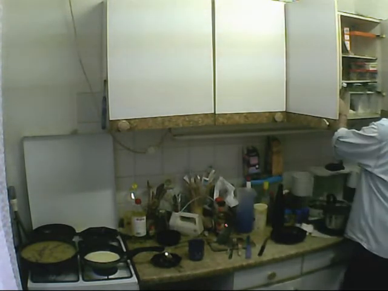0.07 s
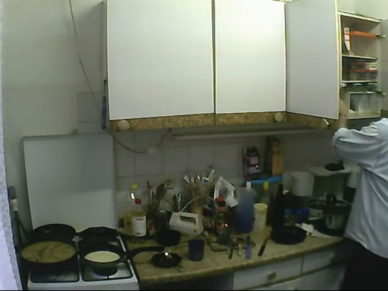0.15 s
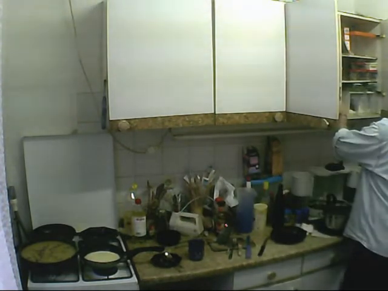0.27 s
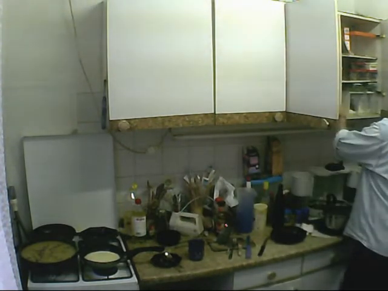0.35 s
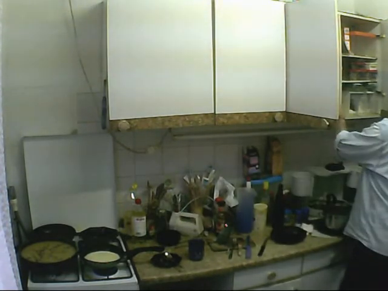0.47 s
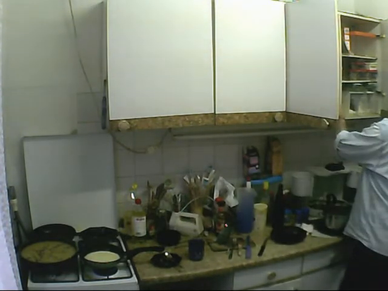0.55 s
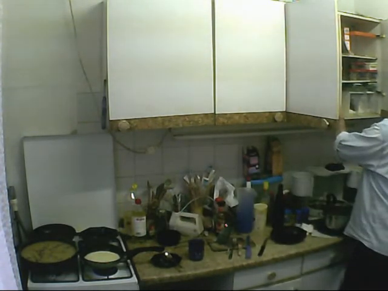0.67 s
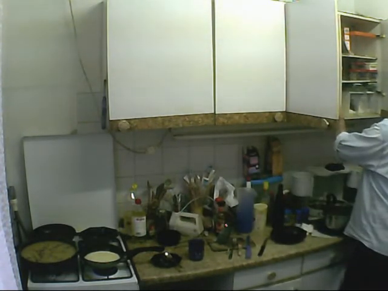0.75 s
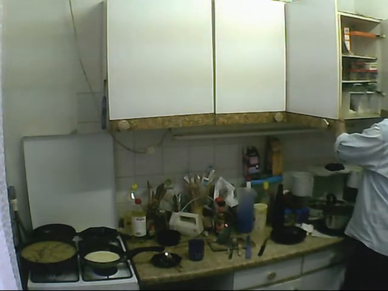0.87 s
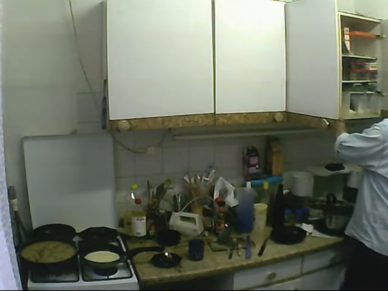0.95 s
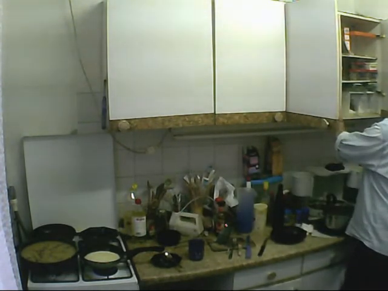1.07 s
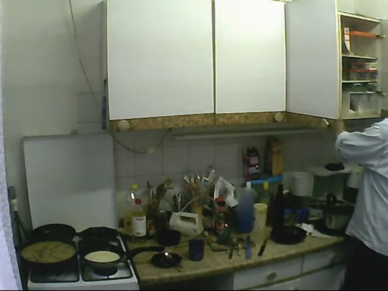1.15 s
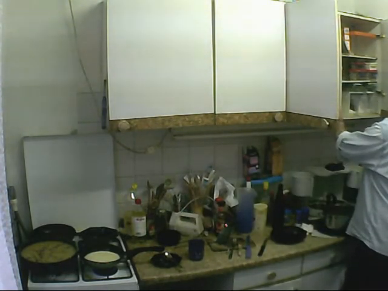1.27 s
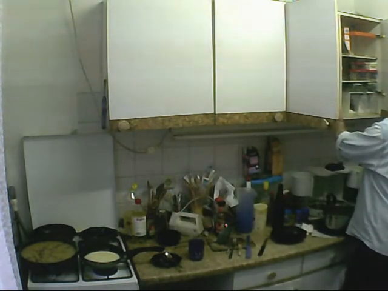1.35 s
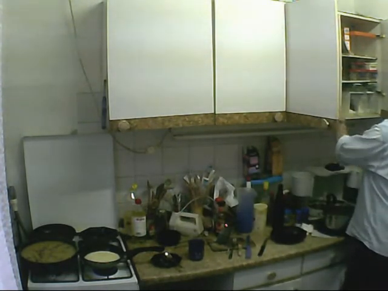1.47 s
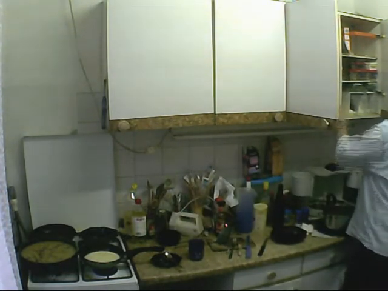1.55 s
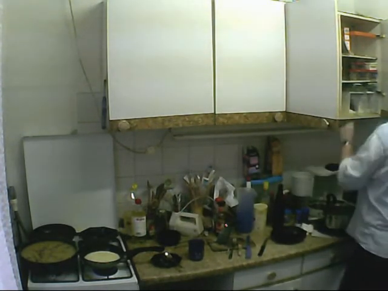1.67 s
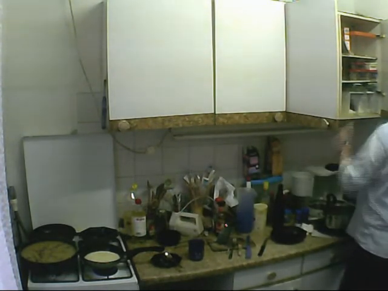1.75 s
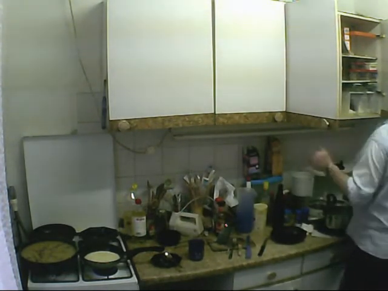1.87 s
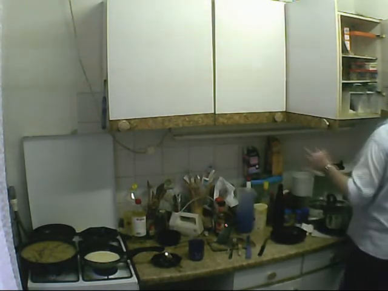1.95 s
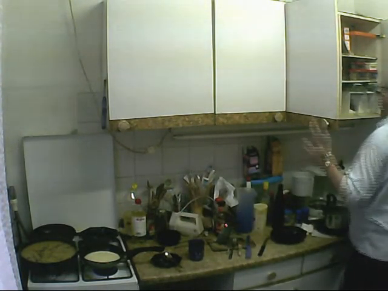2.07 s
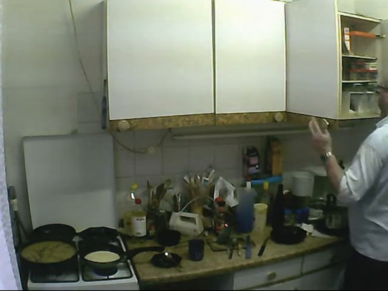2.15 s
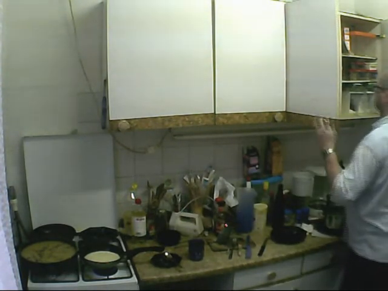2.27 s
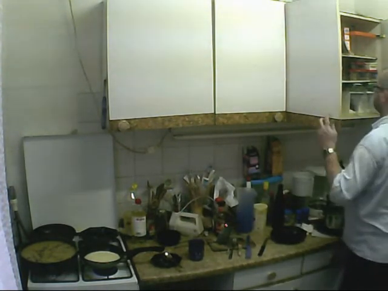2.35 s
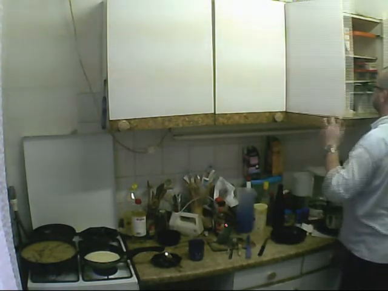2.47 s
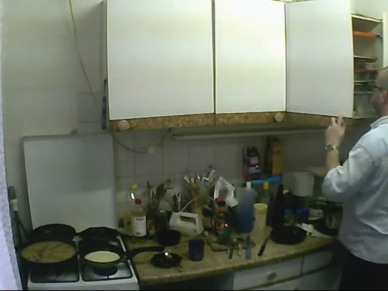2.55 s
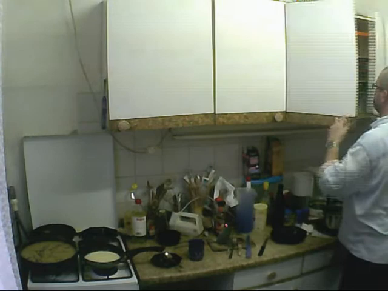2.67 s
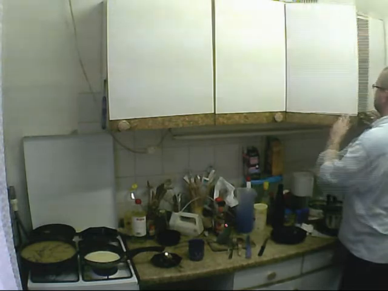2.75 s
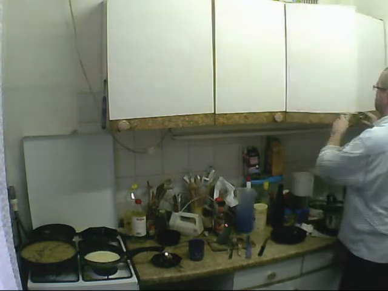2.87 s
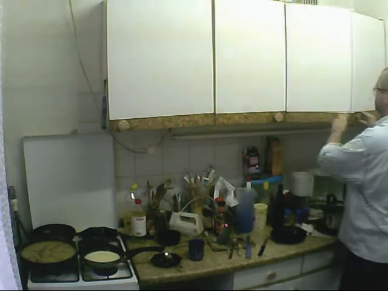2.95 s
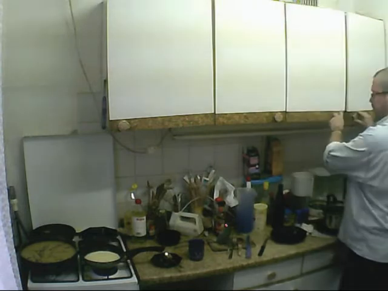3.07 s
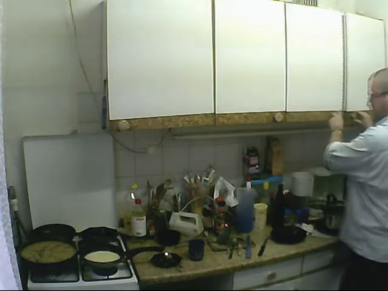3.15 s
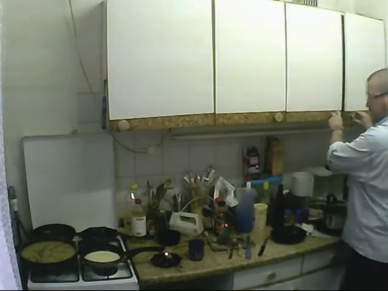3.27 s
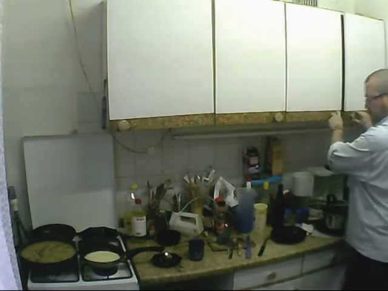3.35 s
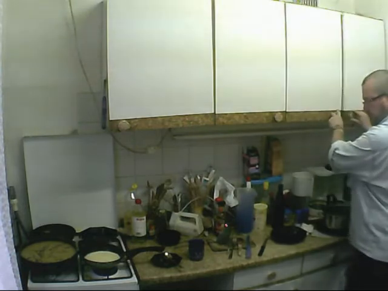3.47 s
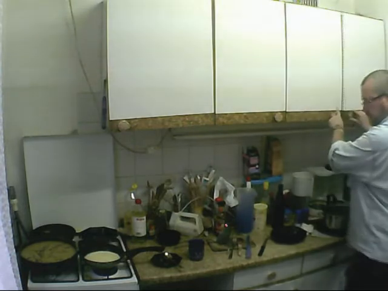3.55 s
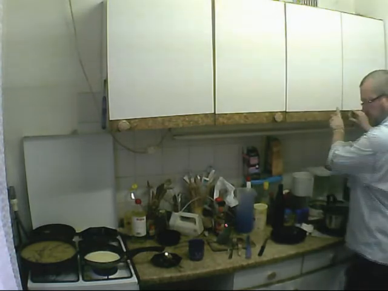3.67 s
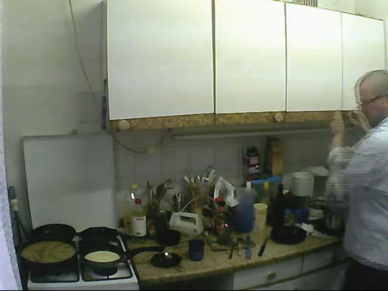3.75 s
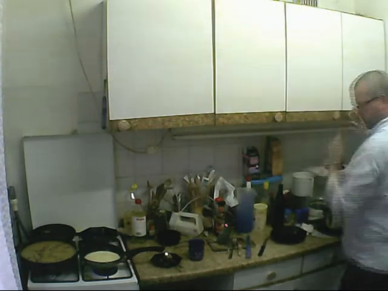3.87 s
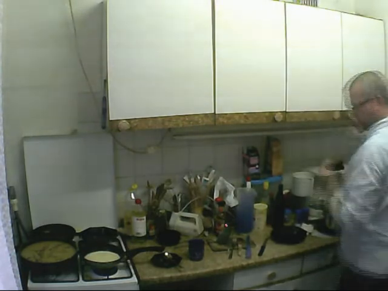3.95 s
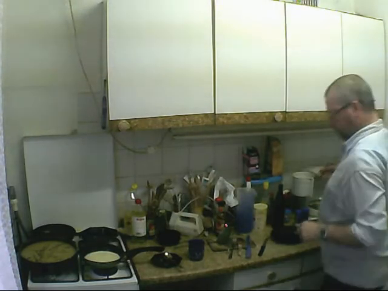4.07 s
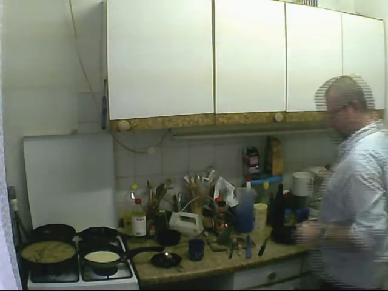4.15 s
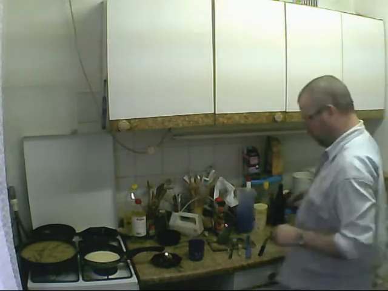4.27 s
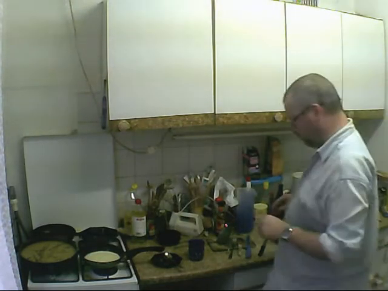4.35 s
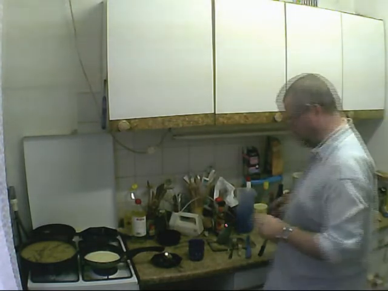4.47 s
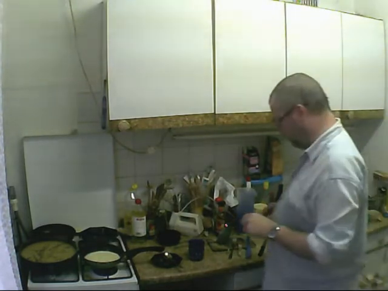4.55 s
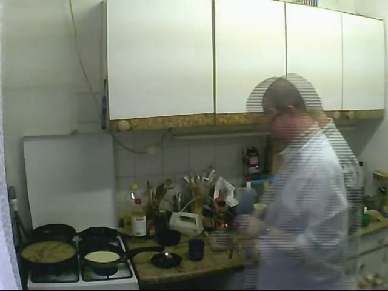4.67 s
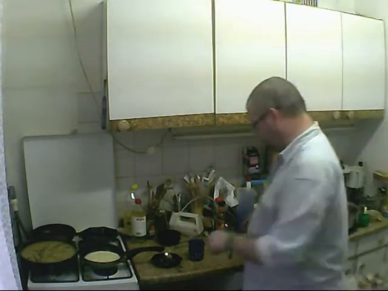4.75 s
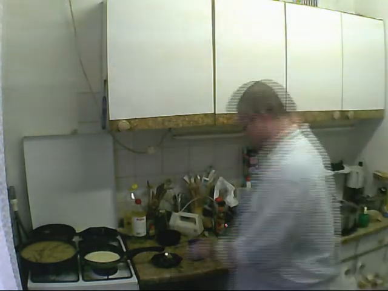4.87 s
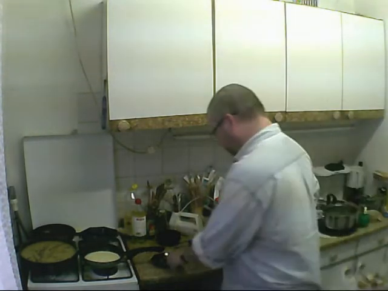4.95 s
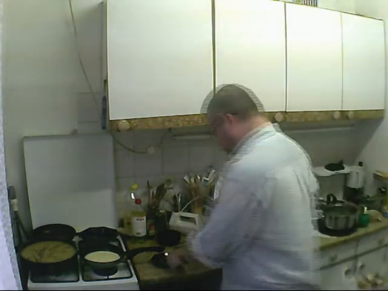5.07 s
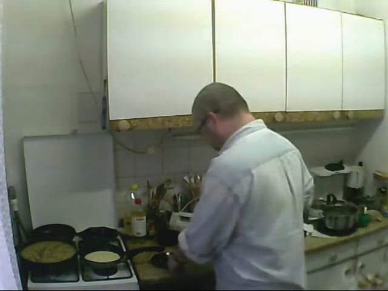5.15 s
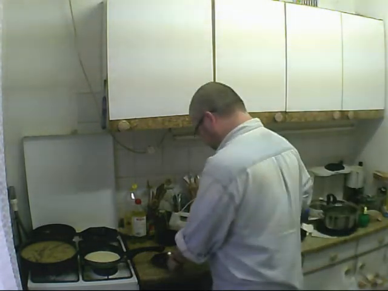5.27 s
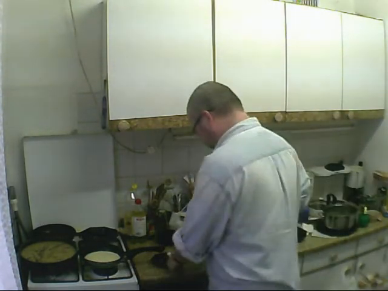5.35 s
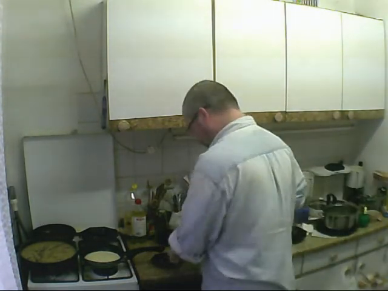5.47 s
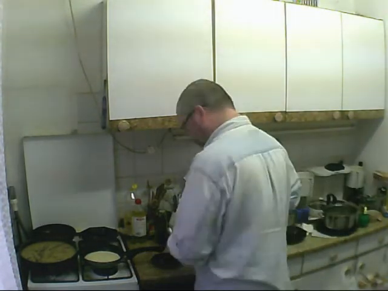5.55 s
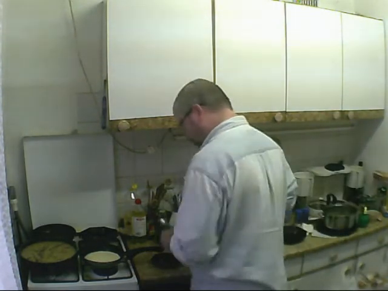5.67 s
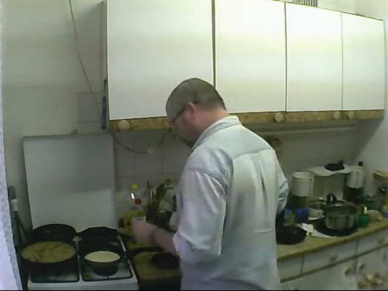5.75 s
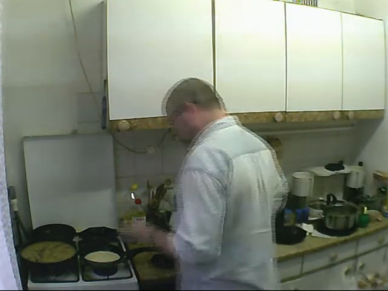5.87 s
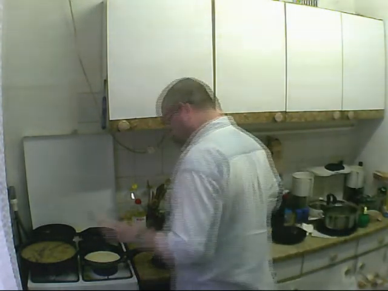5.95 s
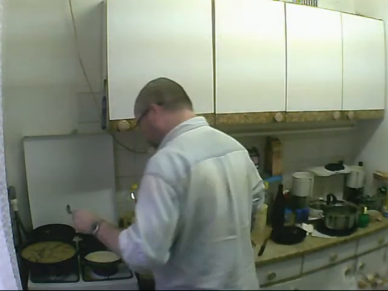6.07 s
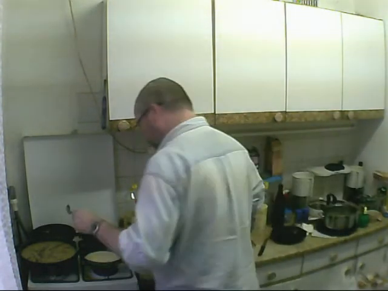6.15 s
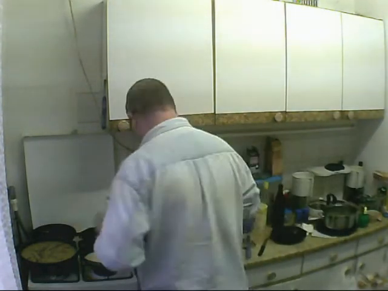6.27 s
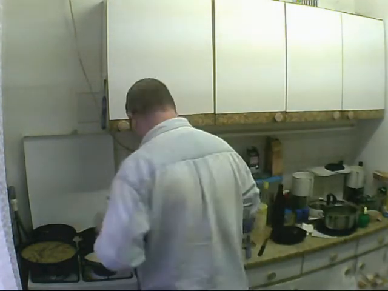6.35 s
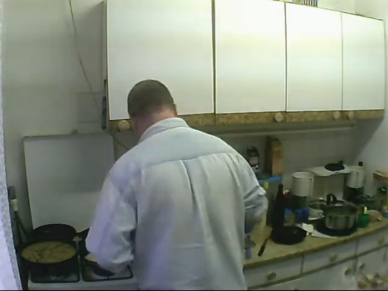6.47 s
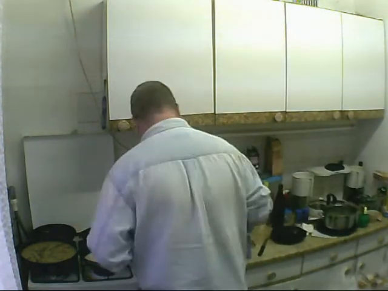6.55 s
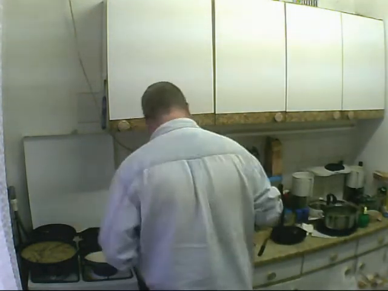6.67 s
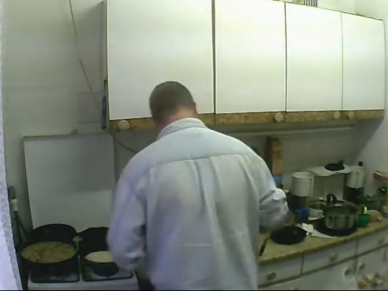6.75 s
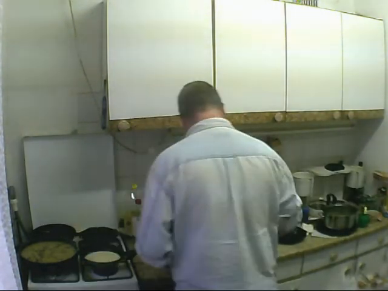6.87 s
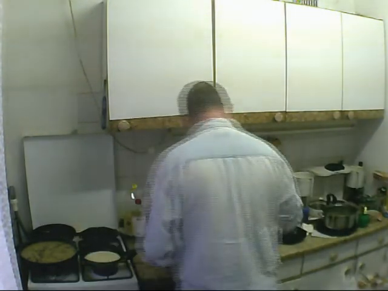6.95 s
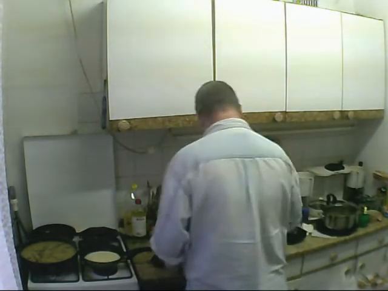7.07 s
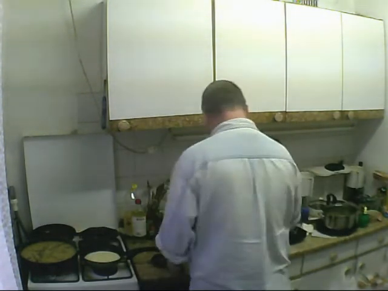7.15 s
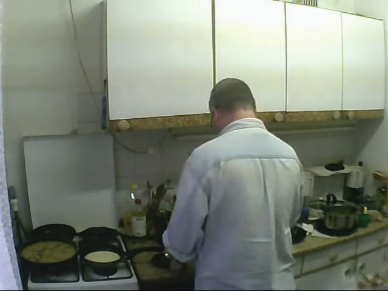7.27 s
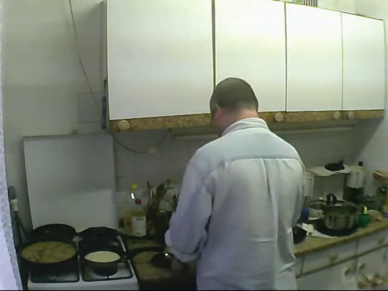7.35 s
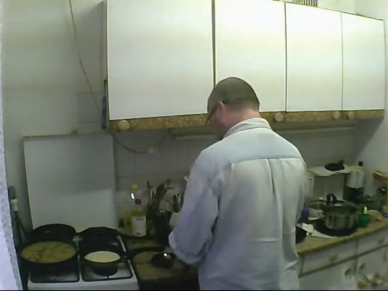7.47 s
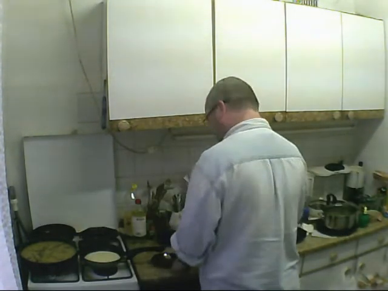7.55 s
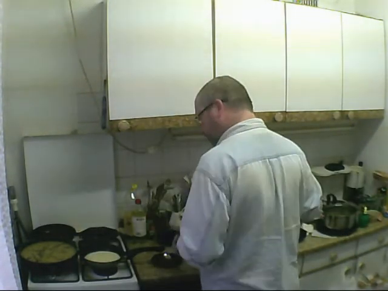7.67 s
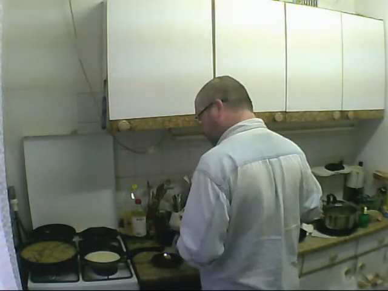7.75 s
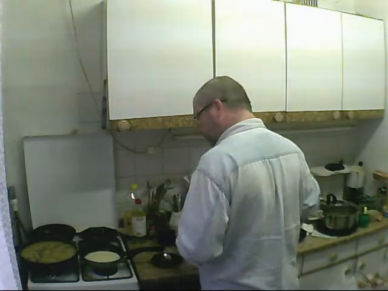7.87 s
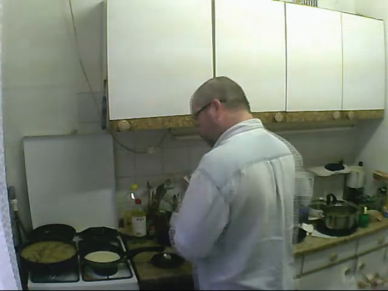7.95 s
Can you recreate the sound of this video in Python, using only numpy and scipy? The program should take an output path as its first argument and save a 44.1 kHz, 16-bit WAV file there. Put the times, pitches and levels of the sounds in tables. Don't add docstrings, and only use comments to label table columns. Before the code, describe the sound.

A small tiled kitchen heard through a cheap, narrow-band camera microphone, with steady low mains hum and faint throbbing hiss. At 0.2-0.35 s a hollow box knocks and booms inside a wall cupboard; quiet sliding and rustle follow to about 1.1 s, with a soft tap at 1.6. From 2.1 s the door leaves bump and swing, with a deeper thump at 2.6 and another at 2.8. A hard wooden slam hits at 3.1 s, then the biggest at 3.4, booming and overloading, with a weak knock at 3.6. Slipper scuffs, cloth rustle and floor-swaying steps run from 3.8 to 5 s. At 5.2 s cutlery clinks on a steel pan with a dull clack. Muffled counter knocks come near 5.85 and 6.5 s, a hard crockery clack with a bounce at 6.83, and a small pot lid lands at 7.25 before it quietens.

```python
import sys
import numpy as np
from scipy import signal
from scipy.fft import rfft, irfft
from scipy.io import wavfile
from scipy.ndimage import uniform_filter1d

SR = 44100
rng = np.random.default_rng(int(sys.argv[2]) if len(sys.argv) > 2 else 0)


def transcribe(signal):
    frames = np.atleast_2d(signal).T
    limited = np.clip(frames, -1, 1)
    pcm = np.round(limited * 32767).astype(np.int16)
    wavfile.write(sys.argv[1], SR, pcm)


def decibels_to_gain(level_db):
    exponent = np.asarray(level_db, float) / 20
    return 10 ** exponent


N = 352800

# multiple of the mains frequency, rms level in dB.
HUM = [(1, -38.5), (3, -50.5), (5, -60), (9, -68), (11, -82)]
MAINS_HZ, MAINS_CREST_S = 49.972, 0.0073
# frequency in Hz, level in dB.
HISS = [(100, 4.5), (300, -4), (670, -4.5), (900, -9.5), (1400, -9.5), (1900, -18), (3040, -16),
        (4500, -25)]
HISS_DB, BUZZ_DEPTH = -56.5, 0.55

# time in seconds, rustle in dB.
BUSY = [(0, -44), (.15, -84), (.4, -65), (.62, -63.5), (1.0, -44), (1.27, -75), (1.67, -53.5),
        (1.91, -59.5), (2.3, -54), (2.9, -76.5), (3.34, -44), (3.5, -46), (3.7, -45), (4.6, -47.5),
        (4.9, -51.5), (7.2, -53), (7.45, -75), (8, -61)]
# time in seconds, peak in dB.
SCUFFS = [
    (1.0, -59),
    (3.17, -58),
    (4.04, -44.5),
    (4.139, -50.5),
]
CLOTH_DB, CLOTH_SHARE = -31.5, 0.56

# time in seconds, floor sway in dB, pushed air in dB.
STEPS = [(2.92, -50, -51), (3.36, -33.5, -43), (3.68, -36.5, -44.5), (3.85, -30.5, -32),
         (3.971, -22.5, -29.5), (4.34, -44.5, -49), (4.652, -18.5, -28.5), (4.77, -21.5, -37.5),
         (4.86, -37, -40.5), (5.08, -32.5, -44.5), (5.28, -39, -49), (5.57, -37.5, -41.5),
         (5.84, -32.5, -28), (6.04, -34, -43.5), (6.63, -35.5, -46.5)]
# time in seconds, peak in dB.
SWINGS = [
    (2.14, -28),
    (2.4, -34.5),
    (2.67, -23),
    (2.81, -29.5),
    (3.28, -23.5),
    (3.6, -25.5),
    (6.551, -37),
]
PUSH_S, SETTLE_S = 0.018, 0.081
STILL_SWAY_DB, STILL_AIR_DB = -51, -59.5

# start in seconds, strength, hollowness and hardness in dB, contact in seconds.
DOORS = [(0.234, -25, -5, -20, 0.043), (0.339, -31, -9, -23, 0.012), (1.13, -40, -2.5, -25, 0.0053),
         (1.57, -33, -11, -25, 0.0016), (2.13, -35, 2.5, -4.5, 0.031), (2.296, -39.5, -3, -42, .012),
         (2.386, -30, -3, -19.5, 0.0059), (2.572, -52.5, -1, 1.5, 0.024), (2.61, -29, -2, -14, 0.048),
         (2.648, -40.5, 7, -4, 0.0066), (2.777, -30, -2, -18.5, 0.023), (2.802, -37, 6.5, -6.5, 0.0071),
         (3.095, -5.5, -10.5, -14, 0.0015), (3.146, -28, 9, -25, 0.014), (3.314, -41.5, -8, -8, .0066),
         (3.384, -30.5, 6, -3.5, 0.011), (3.401, -2, -12.5, -19.5, 0.017), (3.429, -7.5, -10, -22, 0.028),
         (3.616, -36.5, -1.5, -26, 0.031)]
# start in seconds, strength, hollowness and hardness in dB.
BUMPS = [(3.805, -54, -16, -29), (3.888, -27, -7, -11.5), (3.933, -31.5, -16, -30), (4.001, -41, 0, -6),
         (4.073, -42.5, -3.5, -13), (4.135, -35.5, -12, -14), (4.336, -38, 1.5, -15),
         (4.596, -47.5, 13, -7), (4.64, -30, 0.5, -8), (4.689, -35.5, 0, -32), (4.88, -44, -1, -29)]
# start in seconds, strength, hollowness and hardness in dB.
COUNTER = [(5.124, -51.5, 14.5, -14), (5.155, -31.5, 2, -14), (5.203, -24, -12, -4), (5.65, -48.5, -8, -31),
           (5.826, -41.5, 0.5, -18), (5.876, -36.5, -22, -19), (6.036, -36, -2, -23), (6.144, -62, -3, -21),
           (6.445, -39.5, -3, -24.5), (6.482, -36, -1, -26), (6.507, -25.5, -6, -27.5),
           (6.522, -33.5, -6, -27), (6.602, -50, -11, -22), (6.829, -27, -8, -5), (6.855, -38.5, 0.5, 5.5),
           (7.165, -44, -1.5, -15), (7.243, -37.5, -3, -14)]
BUMP_S, COUNTER_S = 0.0082, 0.0095
CLACK_SHARE, COUNTER_CLACK_DB = 0.54, -7.5
# pitch in Hz, level in dB, 60 dB decay in seconds.
PANEL = [(507, -8.5, .04), (577.2, -0.5, 0.11), (608, -2.5, 0.08), (640, 2.5, 0.075), (663, 0, 0.1),
         (698, -0.5, 0.11), (880, -15, 0.024), (990, -15, 0.023), (1052, -9, 0.033)]
# pitch in Hz, level in dB, 60 dB decay in seconds.
CARCASS = [(125, -6.5, 0.01), (165, 2, 0.036), (223, 3, 0.067), (251.6, -2.5, 0.11), (289.4, -3, 0.058),
           (320, -16, 0.013), (384, -6.5, 0.07), (400, -6.5, 0.1)]
# frequency in Hz, level in dB.
CLACK = [(550, -34.5), (900, -1), (1060, -4), (1250, -2), (1500, -0.5), (2100, -3.5), (3000, -16.5),
         (5000, -22)]
# frequency in Hz, level in dB.
RATTLE = [(1200, -20.5), (2200, -2), (3000, 2), (4200, -5), (5200, -9), (6500, -30.5)]

# start in seconds, peak in dB, contact in seconds.
BOX_HITS = [(.243, -22.5, 0.000025), (.254, -17, 0.000023), (.277, -20, 0.000025), (.3, -50.5, 0.0073),
            (.36, -40, 0.031), (.48, -51, 0.059), (.8, -42, 0.035), (.9, -41.5, 0.082),
            (.965, -38.5, 0.022), (1.0, -40.5, 0.036), (1.035, -45, 0.0095), (1.14, -43.5, 0.012),
            (2.39, -30.5, 0.011), (2.42, -37, 0.025)]
# pitch in Hz, level in dB, 60 dB decay in seconds.
BOX = [(218, -12.5, 0.12), (395, -5.5, 0.2), (563, -0.5, 0.18), (586, -12.5, 0.18), (657, -12, 0.18)]
BOX_TOP_HZ = 900

# start in seconds, peak in dB,
# pitch in Hz, 60 dB decay in seconds.
THUDS = [(0.253, -32.5, 76.5, 0.25), (2.099, -24, 86.3, 0.2), (2.142, -36.5, 99, 0.3),
         (2.385, -26.5, 76.7, 0.22), (2.603, -10, 84.7, 0.12), (2.652, -22.5, 114, 0.095),
         (2.775, -18, 101.2, 0.24), (2.821, -25.5, 72.6, 0.24), (3.095, 3.5, 83, 0.083),
         (3.099, -21.5, 174, 0.23), (3.147, -27.5, 117, .2), (3.352, -26, 65, 0.14),
         (3.397, -7, 60.3, 0.15), (3.405, 9, 89.6, 0.094), (3.111, -9, 27.95, 0.47),
         (3.415, -5, 29.6, 0.25), (3.445, -15.5, 115, 0.19), (3.499, -30, 82, 0.22),
         (3.614, -17.5, 92, 0.094), (3.893, -41, 126, 0.12), (4.639, -33, 82, 0.27), (4.769, -36, 71, 0.15),
         (5.125, -43, 125, 0.19), (5.842, -29.5, 75.5, 0.18), (6.505, -22.5, 100, 0.076),
         (6.83, -50.5, 108.4, 0.076)]

# start in seconds, strength in dB.
TAPS = [
    (1.13, -41),
    (1.572, -42),
    (3.314, -48.5),
    (4.338, -45),
    (6.04, -55),
    (6.508, -38),
    (7.162, -44),
]
# frequency in Hz, level in dB.
TAP = [(700, -12.5), (1300, -5), (1700, 3.5), (2100, -4), (2700, -11.5), (4000, -23.5)]
TAP_S = 0.006

# start in seconds, peak in dB, contact in seconds.
PAN_HITS = [
    (5.207, -47, 2e-5),
    (5.22, -56, 2e-5),
    (5.243, -60, 2e-5),
    (5.275, -62, 2e-5),
]
# pitch in Hz, level in dB, 60 dB decay in seconds.
PAN = [(1297, -12, .25), (2040, -14, .15), (2600, -1, .36), (4025, -1, .28), (4068, -3, .28),
       (4667, -12, .15), (5130, -7, .12), (5405, -1, .27), (5780, 6, .025)]
# start in seconds, peak in dB, contact in seconds.
CUP_HITS = [
    (5.209, -32, .004),
    (5.218, -27.5, 0.0036),
    (6.83, -22.5, 0.001),
    (6.852, -32, 0.002),
    (7.245, -29, .008),
]
# pitch in Hz, level in dB, 60 dB decay in seconds.
CUP = [(1906, -5, 0.021), (2760, -9.5, .015), (3600, -5, 0.0095), (3720, 2.5, 0.013), (3980, 3, 0.01),
       (4450, -29, 0.0045)]
# start in seconds, peak in dB, contact in seconds.
POT_HITS = [
    (7.246, -47, 1.4e-5),
    (7.278, -54, 1e-5),
    (7.335, -62, 1e-5),
]
# pitch in Hz, level in dB, 60 dB decay in seconds.
POT = [(1885, 6, 0.029), (2053, -0.5, 0.041), (2657, 0.5, 0.18), (3570, -15, 0.054), (3640, -4, 0.057),
       (3850, -10, 0.11), (4350, -7, 0.065), (4430, -11, 0.06)]

# band centre in Hz, 60 dB decay in seconds.
ROOM = [(150, 0.24), (400, 0.21), (900, 0.21), (2000, 0.34), (4000, 0.22)]
ROOM_DB = 1
WET_DB = 0.5
RISE_S = 0.0078

# pitch in Hz, width in Hz, boost in dB.
HOUSING = [(1984, 83, 11), (725, 2100, -1), (1315, 32, 7)]
# frequency in Hz, dB against the middle band.
MUTE_BELOW = [(3000, -40), (3600, -14), (4500, -9.5), (5300, -29), (5800, -22.5)]
TOP_HZ = 4900
IMAGE_HZ, IMAGE_DB = 8000, -62


def level(x, db):
    return x * decibels_to_gain(db) / np.sqrt(np.mean(x ** 2))


def colour(x, table):
    hz, db = np.transpose(table)
    f = np.fft.rfftfreq(len(x), 1 / SR) + 1
    gain = decibels_to_gain(np.interp(np.log(f), np.log(hz), db))
    return irfft(rfft(x) * gain, len(x))


def band(x, lo_hz, hi_hz):
    return signal.sosfilt(signal.butter(2, [lo_hz, hi_hz], "band", fs=SR, output="sos"), x)


def ring(x, modes):
    out = 0
    for hz, db, t60 in modes:
        pole = np.exp(2j * np.pi * hz / SR - np.log(1000) / (t60 * SR))
        out = out + decibels_to_gain(db) * signal.lfilter([1], [1, -pole], x).imag
    return out


def contacts(s, db, length, t60=0.001):
    size = 16384
    out, t = np.zeros(N + size), np.arange(1, size + 1) / SR
    tail = decibels_to_gain(WET_DB) * np.exp(-np.log(1000) * t / t60) * (t60 > 0.01)
    grits = rng.standard_normal((len(s), size))
    for start, gain, tau, grit in zip(s, decibels_to_gain(np.array(db)), length, grits):
        tau = max(tau, 1e-5)
        build_up = 1 - np.exp(-t / min(tau, RISE_S))
        force = grit * (np.exp(-t / tau) + tail) * build_up
        i = int(start * SR)
        out[i:i + size] += gain * force / np.sqrt(np.sum(force ** 2))
    return out[:N]


def curve(table):
    s, *columns = np.transpose(table)
    return [np.interp(np.arange(N) / SR, s, c) for c in columns]


def walk(rate):
    k = int(SR / rate)
    steps = np.repeat(rng.standard_normal(N // k + 1), k)
    return 2.03 * uniform_filter1d(uniform_filter1d(steps, k), k)[:N]


def swells(s, db):
    coarse = np.arange(0, N, 64)
    lag = coarse / SR - np.array(s)[:, None]
    gain = decibels_to_gain(np.array(db)) @ np.exp(np.where(lag < 0, lag / PUSH_S, -lag / SETTLE_S))
    return np.interp(np.arange(N), coarse, gain)


def room(x):
    t = np.arange(SR // 2) / SR
    tail = 0
    for hz, t60 in ROOM:
        tail = tail + band(rng.standard_normal(len(t)), hz / 2.0, hz * 2.8) * np.exp(-np.log(1000) * t / t60)
    tail = tail * np.clip(t / 0.0095, 0, 1)
    return x + signal.fftconvolve(x, decibels_to_gain(ROOM_DB) * tail / np.sqrt(np.sum(tail ** 2)))[:N]


def mains():
    phase = 2 * np.pi * MAINS_HZ * (np.arange(N) / SR - MAINS_CREST_S)
    hum = sum(np.sqrt(2) * decibels_to_gain(db) * np.cos(round(k) * phase) for k, db in HUM)
    hiss = level(colour(rng.standard_normal(N), HISS), HISS_DB)
    throb = np.exp(BUZZ_DEPTH * np.cos(2 * phase - 0.6) + 0.073 * np.cos(phase - 1.5))
    return hum + hiss * throb * decibels_to_gain(1.1 * walk(11))


def mover():
    busy_db = curve(BUSY)[0]
    dull = level(ring(rng.standard_normal(N), PANEL + CARCASS[4:]), -5.5)
    dull = dull * decibels_to_gain(busy_db + 0.65 * walk(7.1))
    bright = colour(rng.standard_normal(N), RATTLE) + colour(rng.standard_normal(N), CLACK)
    bright = level(bright, -9) * decibels_to_gain(1.7 * walk(30))
    return dull + bright * (decibels_to_gain(CLOTH_DB + CLOTH_SHARE * busy_db) + swells(*np.transpose(SCUFFS)))


def heave():
    s, sway_db, air_db = np.transpose(STEPS)
    sway = level(band(rng.standard_normal(N), 7, 13.7), 0) * (decibels_to_gain(STILL_SWAY_DB) + swells(s, sway_db))
    push = decibels_to_gain(STILL_AIR_DB) + swells(s, air_db) + swells(*np.transpose(SWINGS))
    return sway + level(band(rng.standard_normal(N), 23, 35), 0) * push


def cupboard():
    rows = [(*r, 0) for r in DOORS]
    rows += [(*r, BUMP_S, 0) for r in BUMPS]
    rows += [(*r, COUNTER_S, COUNTER_CLACK_DB) for r in COUNTER]
    s, db, hollow_db, hard_db, length, stop_db = np.transpose(rows)
    panel = ring(contacts(s, db - 11.5, length, t60=0.26), PANEL)
    carcass = ring(contacts(s, db + hollow_db - 4.5, length, t60=0.35), CARCASS)
    clack_db = db + CLACK_SHARE * hard_db + stop_db + 34.0
    clack = colour(contacts(s, clack_db, 1.1 * length, t60=0.28), CLACK)
    rattle = colour(contacts(s, db + hard_db + 34.5, 0.2 * length, t60=0.25), RATTLE)
    return panel + carcass + clack + rattle


def hollow_box():
    box = ring(contacts(*np.transpose(BOX_HITS)), BOX)
    return band(band(box, 100, BOX_TOP_HZ), 100, BOX_TOP_HZ)


def thuds():
    out, t = np.zeros(N + SR), np.arange(SR) / SR
    for s, db, hz, t60 in THUDS:
        swell = (1 - np.exp(-1.2 * hz * t)) ** 2
        swing = np.sin(2 * np.pi * hz * t) * np.exp(-np.log(1000) * t / t60) * swell
        i = int(s * SR)
        out[i:i + SR] += 1.66 * decibels_to_gain(db) * swing
    return out[:N]


def finger_taps():
    s, db = np.transpose(TAPS)
    return colour(contacts(s, db + 28.5, np.full(len(s), TAP_S), t60=0.25), TAP)


def pan_and_pot():
    pan = ring(contacts(*np.transpose(PAN_HITS)), PAN)
    pot = ring(contacts(*np.transpose(POT_HITS)), POT)
    return room(pan + pot)


def crockery():
    return ring(contacts(*np.transpose(CUP_HITS), t60=0.22), CUP)


def scene():
    air = mover() + cupboard() + hollow_box() + finger_taps() + pan_and_pot() + crockery()
    for hz, width, db in HOUSING:
        air = air + (decibels_to_gain(db) - 1) * signal.lfilter(*signal.iirpeak(hz, hz / width, SR), air)
    return (air + thuds() + heave() + mains())[None]


def mute_weak_patches(x):
    hz, _, z = signal.stft(x, SR, nperseg=2048)
    size = np.abs(z)
    middle = np.median(size[(hz > 1000) & (hz < 3500)], axis=0)
    limit = decibels_to_gain(np.interp(hz, *np.transpose(MUTE_BELOW)))[:, None] * middle
    kept = z * (uniform_filter1d(size, size=6, axis=0) > limit)
    return signal.istft(kept, SR, nperseg=2048)[1][:N]


def top_cut(x):
    return signal.sosfilt(signal.butter(12, 16000, fs=SR, output="sos"), x)


def record(dry):
    low_pass = signal.cheby2(10, 70, 1.313 * TOP_HZ, fs=SR, output="sos")
    narrow = mute_weak_patches(signal.sosfilt(low_pass, dry[0]))[None]
    bass = uniform_filter1d(narrow, size=200)
    image = decibels_to_gain(IMAGE_DB) * bass * np.cos(2 * np.pi * IMAGE_HZ * np.arange(N) / SR)
    limited = narrow / (1 + np.abs(narrow) ** 24) ** (1 / 24)
    return top_cut(np.clip(limited * 1.018 + image, -1, 1))


dry = scene()
out = record(dry)
transcribe(out)
```